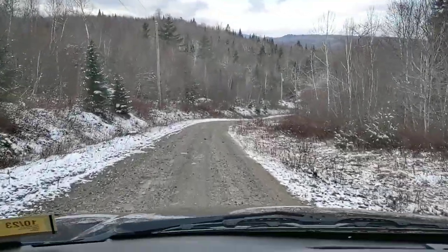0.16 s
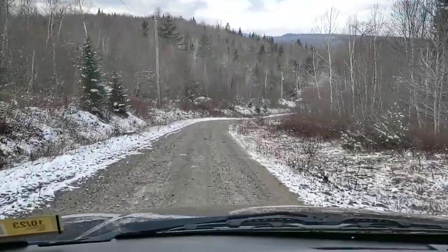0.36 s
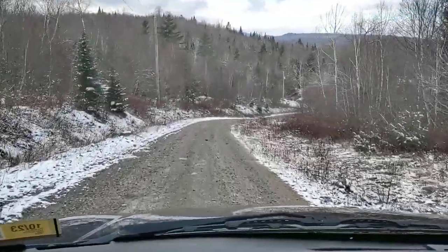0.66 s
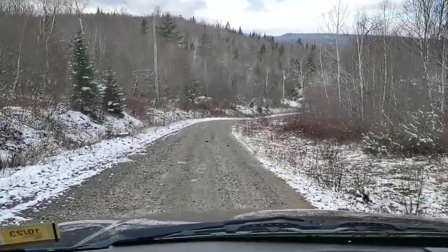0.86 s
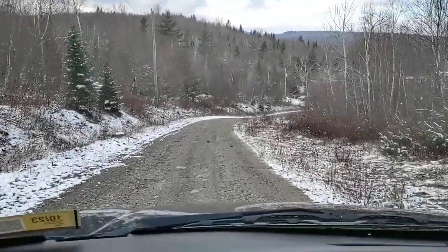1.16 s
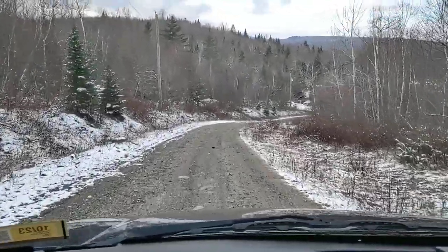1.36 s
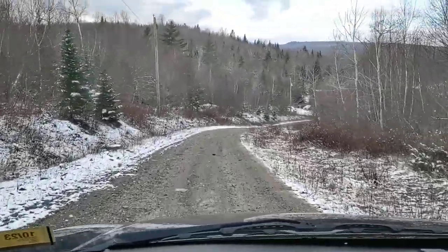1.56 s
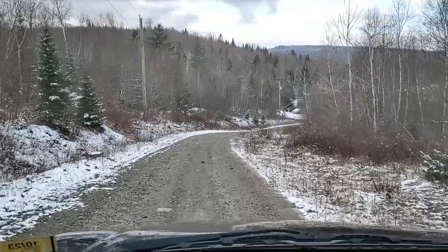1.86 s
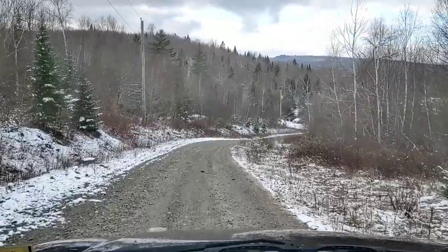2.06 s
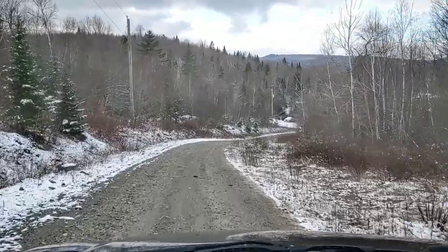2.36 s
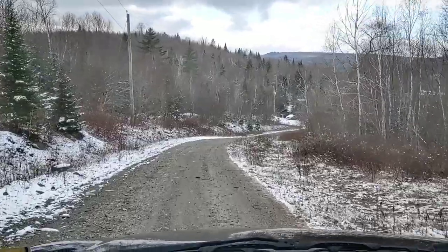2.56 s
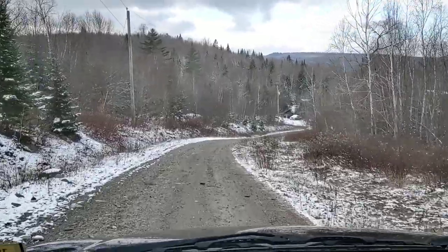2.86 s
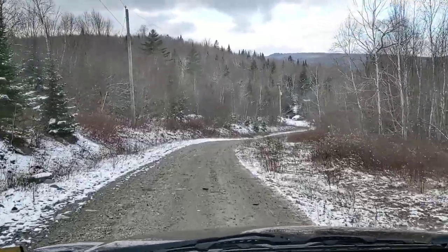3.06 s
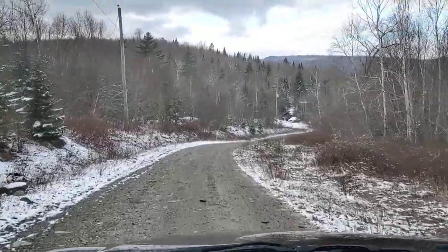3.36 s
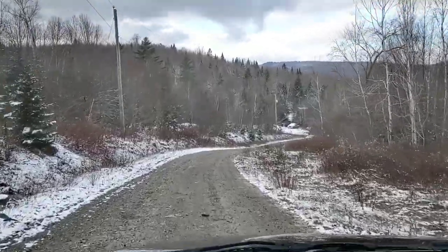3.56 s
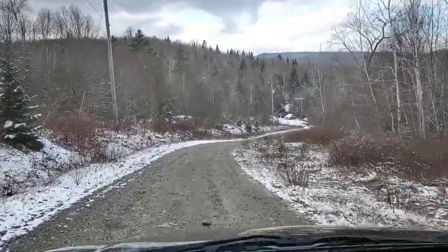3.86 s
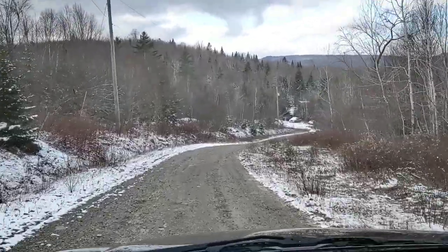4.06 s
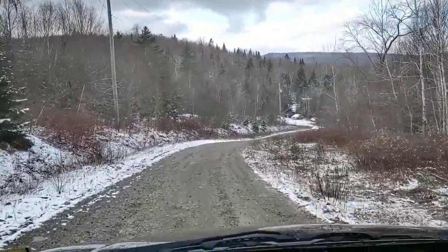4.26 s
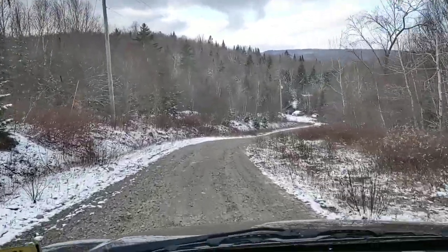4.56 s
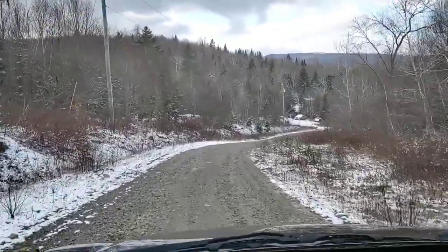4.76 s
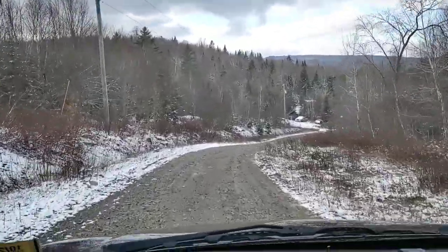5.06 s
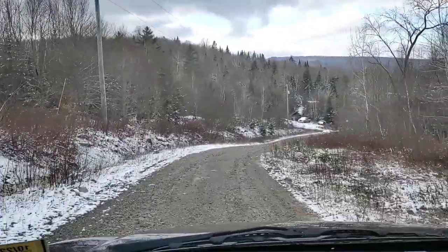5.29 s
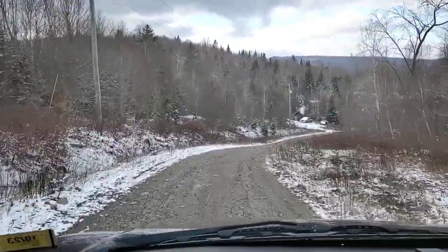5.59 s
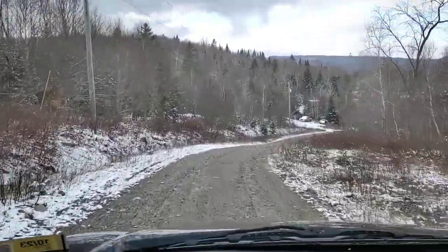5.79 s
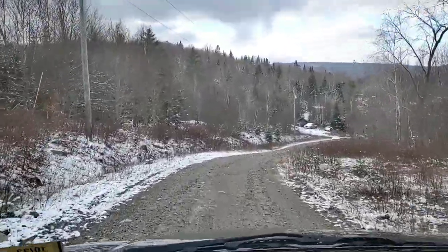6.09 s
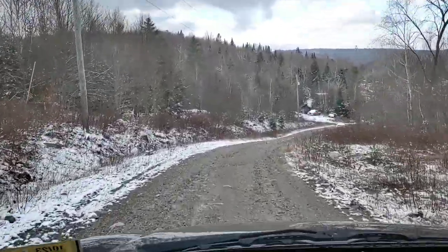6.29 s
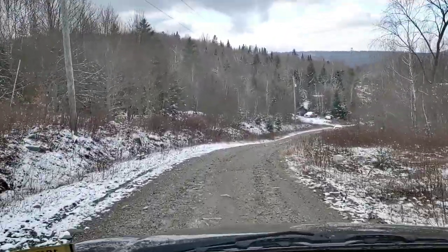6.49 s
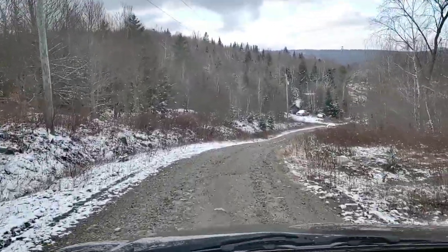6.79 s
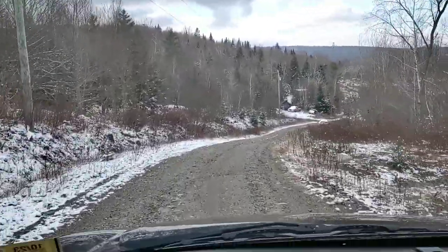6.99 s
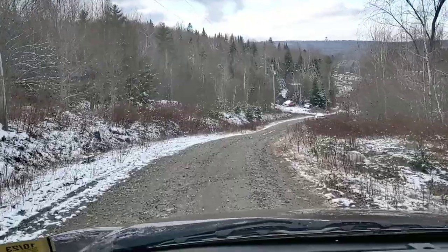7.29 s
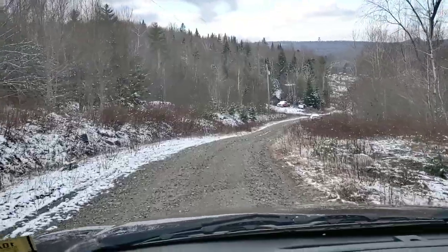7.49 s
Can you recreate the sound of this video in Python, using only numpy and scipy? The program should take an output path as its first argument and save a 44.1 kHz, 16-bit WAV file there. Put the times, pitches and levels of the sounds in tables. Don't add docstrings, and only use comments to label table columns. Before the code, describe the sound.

A quiet vehicle cabin on a rough dirt road, with a deep uneven rumble, muffled crackle, and scattered stones pinging against the wheel arches.

```python
import sys
import numpy as np
from scipy import signal
from scipy.fft import rfft, irfft, next_fast_len
from scipy.io import wavfile
from scipy.ndimage import uniform_filter1d, map_coordinates

SR = 44100
rng = np.random.default_rng(int(sys.argv[2]) if len(sys.argv) > 2 else 0)


def gain_from_decibels(decibels):
    exponent = np.asarray(decibels, float) / 20
    return 10 ** exponent


def to_wav(s):
    ch = np.atleast_2d(s).T
    pcm = np.round(np.clip(ch, -1, 1) * 32767)
    wavfile.write(sys.argv[1], SR, pcm.astype(np.int16))


N = 336924

# frequency_hz, density_db
HISS_SPECTRUM = [(1500, -10), (3000, -14), (6000, -4), (9000, -2), (12500, -20), (14000, -30)]
# frequency_hz, correlation
PORT_LIKENESS = [(60, 0.99), (130, 1), (270, 0.87), (580, 0.73), (1240, -0.044), (2650, -0.18),
                 (5650, 0.088), (12000, -0.024)]
# frequency_hz, left_minus_right_db
PORT_BALANCE = [(60, -1), (110, -1.5), (190, -2), (350, -2), (630, -0.5), (1140, 2.5), (2060, 2.5),
                (3710, 0), (6680, 0), (12000, -2)]
# frequency_hz, density_db
ENGINE_SPECTRUM = [(600, -30), (1150, 0), (1400, -10), (1750, -10), (2000, -4), (2400, -12), (7000, -30),
                   (13000, -45)]
# frequency_hz, t60_s
CABIN_DECAY = [(300, 0.1), (1500, 0.25), (5000, 0.099), (12000, 0.019)]

# start_s, peak_db, centre_hz
GRIT_CHIPS = [(0.9617, -67, 5110), (0.9996, -65, 5150), (1.4406, -73, 5190), (1.6043, -58, 5060),
              (2.1467, -53.5, 5400), (2.2034, -64, 5000), (2.5621, -65.5, 5030), (2.652, -62, 7400),
              (3.118, -61.5, 5080), (3.4017, -67, 5140), (3.5289, -80, 5110), (3.5698, -78, 5140),
              (3.738, -61.5, 5080), (3.8377, -60.5, 5110), (4.3046, -57.5, 5600), (5.5657, -70, 5560),
              (6.0422, -64.5, 5970), (6.106, -70, 5140), (6.369, -61.5, 5660), (6.6982, -75, 5130),
              (6.8567, -65, 5140), (6.8843, -61.5, 5840), (7.505, -70, 5100)]
# start_s, peak_db, centre_hz
STONE_BOUNCES = [(.353, -52.5, 1020), (.638, -81, 2700), (1.008, -55, 1200), (1.447, -49, 1150),
                 (1.870, -57, 1020), (1.966, -46.5, 1450), (2.214, -51, 1230), (2.529, -66, 2680),
                 (2.565, -61, 3000), (3.753, -56.5, 1980), (3.837, -54.5, 2840), (4.312, -51, 2220),
                 (4.306, -52, 2890), (4.953, -70, 3600), (5.597, -58, 1820), (6.517, -62.5, 2090),
                 (6.698, -70, 2300), (6.858, -62.5, 2100), (7.504, -51, 1260)]
# start_s, peak_db, ring_hz
TREAD_KNOCKS = [(0.354, -46, 423), (1.086, -40, 256), (1.095, -48, 177), (1.441, -42.5, 620),
                (1.599, -34, 197), (1.719, -36.5, 490), (1.871, -40, 318), (1.952, -39.5, 534),
                (2.149, -39, 700), (2.214, -41, 350), (2.444, -36.5, 507), (2.474, -37, 407),
                (2.484, -41.5, 704), (2.99, -51, 473), (3.207, -36, 272), (3.267, -41.5, 680),
                (3.527, -43, 500), (3.603, -45, 352), (3.706, -42, 297), (4.318, -47, 700),
                (5.851, -45.5, 735), (6.045, -62, 307), (6.158, -48, 340), (6.211, -44.5, 270),
                (6.363, -68, 353), (6.446, -41, 410), (6.604, -42.5, 290), (6.914, -45, 340),
                (7.07, -49, 318), (7.285, -45.5, 487)]
# start_s, peak_db, ring_hz, left_minus_right_db
CLEAR_PINGS = [(.633, -64, 2650, 2), (.933, -56, 900, 0), (1.083, -62, 2550, 0), (1.199, -53.5, 1360, -2),
               (1.446, -60, 4760, 0), (1.596, -58, 5100, 2), (1.602, -44, 720, 9), (1.606, -46, 2930, 6),
               (1.607, -52, 4630, 0), (1.654, -44, 1480, 5), (1.659, -56, 2930, 2), (1.829, -62, 2920, 5),
               (1.870, -45, 793, 0), (2.149, -46, 3880, -2), (2.205, -51, 4920, 4), (2.216, -48, 1970, 0),
               (2.248, -55, 3000, 4), (2.444, -59, 3840, 0), (2.473, -37, 590, -2), (2.481, -47, 680, 0),
               (2.489, -41, 650, 5), (2.731, -56, 900, 2), (3.200, -47, 804, 0), (3.265, -57, 2700, 5),
               (3.271, -44, 700, -3), (3.391, -61, 2600, 0), (3.526, -60, 3850, 0), (3.652, -54, 2960, 0),
               (3.705, -61, 2900, 0), (3.754, -64, 4200, 0), (3.790, -44, 764, 3), (3.974, -61, 790, -7),
               (4.306, -48, 2860, 0), (4.307, -33.5, 734, 0), (4.308, -42.5, 2170, -6),
               (4.498, -55, 815, 0), (5.266, -63, 2720, -1), (5.372, -58, 770, 0), (5.763, -63, 2960, 0),
               (5.860, -61, 3000, 0), (6.044, -54, 2900, 0), (6.045, -61, 4600, 2), (6.110, -57, 2500, 0),
               (6.160, -57, 796, -2), (6.504, -66, 2710, 3), (6.638, -64, 2610, 0), (6.915, -50, 815, 0),
               (6.934, -63, 2880, 0), (7.097, -62, 2580, 0), (7.360, -61, 2520, 0)]
# start_s, peak_db, ring_hz, edge_db, left_minus_right_db
STEEL_HITS = [(.3521, -53, 1400, -7, -3), (1.6005, -42.5, 1850, -20, 2), (2.0423, -65, 1990, -21, 23),
              (2.1474, -36, 2180, -6, 0.5), (2.2044, -44.5, 2640, -4, 10), (2.2478, -49.5, 2040, -22, 10),
              (3.1388, -48.5, 1390, -25, 6), (3.1717, -48, 1660, -18, 3), (3.1991, -48.5, 2140, -24, 6),
              (3.2345, -51, 1930, -19, 8), (3.2849, -47.5, 1440, -19, 7), (3.7883, -47, 2080, -10, 0),
              (3.8377, -48, 1940, -26, 4), (4.3066, -46, 2300, -11, 3), (5.3113, -53, 1900, -6, 2),
              (6.8838, -54, 1520, -4, 3), (7.0723, -53, 1620, -11, 1), (7.1621, -51, 1460, -10, 3)]
# start_s, peak_db, ring_hz, edge_db, left_minus_right_db
LINER_HITS = [(0.9973, -44.5, 1300, -9, -1), (1.155, -48, 1390, -28, 4), (1.4398, -41, 1420, -8.5, 2),
              (1.5028, -45.5, 1410, -10, 0), (1.6063, -49, 2720, 5.5, 0), (1.6533, -39.5, 1480, -20, 7),
              (1.952, -36, 1450, -41, 1), (2.4457, -37, 1530, -12, 3), (2.99, -47, 1520, -13, -5.5),
              (3.118, -49, 2220, -28, 5), (3.5275, -37.5, 1500, -10, 2), (3.571, -41, 2680, -5.5, 7.5),
              (3.6516, -62, 2480, -25, -2), (3.7365, -43.5, 1430, -16, 6), (5.8572, -45.5, 1640, -9, 0),
              (6.0412, -49, 1470, -9, 5), (6.1095, -43.5, 1390, -9, 2), (6.789, -51, 1530, -10, -3),
              (7.1184, -50.5, 1510, -20, -2), (7.5046, -53, 2000, -1, 6)]
# start_s, peak_db, ring_hz
PEBBLE_HITS = [(0.743, -51, 1740), (0.9343, -48.5, 1430), (0.9613, -50.5, 2020), (1.1197, -50.5, 1950),
               (1.197, -53, 1840), (1.7485, -51, 1510), (2.5112, -57, 1500), (2.731, -62, 1510),
               (3.3206, -55, 1610), (3.3325, -63, 1420), (3.626, -51.5, 1490), (3.898, -52, 1470),
               (3.973, -75, 1500), (4.248, -63, 1490), (4.498, -57, 1460), (4.7371, -71, 1660),
               (4.8983, -57, 1400), (5.2614, -55, 1520), (5.377, -67, 1560), (5.584, -50.5, 1410),
               (5.8911, -47, 1440), (6.516, -63, 1500), (6.641, -56, 1560), (6.8458, -66, 1750),
               (6.856, -48.5, 1350), (7.0369, -52, 1480), (7.205, -50.5, 1890), (7.2932, -51.5, 1500)]
# centre_hz, width_hz, level_db
PANEL_MODES = [(533, 130, -5), (735, 150, 25), (900, 35, -7)]

# start_s, peak_db, swing_hz
BODY_THUMPS = [(0.056, -48, 81.7), (0.165, -44, 51.1), (0.33, -42.5, 49), (0.43, -44.5, 60),
               (0.602, -40.5, 72.7), (0.911, -39.5, 53), (0.986, -39, 69), (1.079, -41, 56.5),
               (1.593, -30, 48.8), (1.659, -33, 51.1), (1.841, -34, 65), (2.041, -41, 80),
               (2.14, -45.5, 88), (2.339, -37.5, 43.1), (2.563, -42, 87.5), (2.735, -40.5, 58.3),
               (2.899, -41, 63.4), (3.123, -44, 43.1), (3.374, -35.5, 63.6), (3.572, -47, 53.8),
               (3.774, -40, 46), (3.911, -38, 46), (4.018, -39, 51.5), (4.286, -39, 48.4),
               (4.359, -43, 42.7), (4.578, -47, 51), (4.816, -44, 67.3), (4.927, -42, 51.1),
               (5.01, -41.5, 55), (5.249, -34.5, 51.5), (5.395, -38, 56.5), (5.578, -34.5, 71),
               (5.759, -34.5, 64.6), (5.852, -33, 59.6), (5.95, -42, 59.2), (6.194, -42, 53.3),
               (6.298, -47, 94.2), (6.419, -41, 52.7), (6.639, -33, 56.8), (6.905, -42, 45.8),
               (6.968, -36, 67.3), (7.061, -43, 54.7), (7.302, -35, 46), (7.449, -38, 54.3)]
# start_s, peak_db, ring_hz
TYRE_PUNCHES = [(0.235, -51, 172), (0.625, -66, 121), (0.753, -45, 140), (0.93, -45, 121),
                (0.998, -45, 262), (1.084, -35.5, 184), (1.109, -37, 180), (1.149, -41, 148),
                (1.717, -42.5, 142), (2.056, -42, 121), (2.421, -37.5, 162), (2.933, -46, 122),
                (3.127, -47, 184), (3.169, -45, 164), (3.198, -42, 172), (3.229, -45, 121),
                (3.257, -44, 140), (3.299, -41, 121), (3.705, -40, 127), (3.784, -47, 159),
                (3.856, -48, 121), (4.241, -53, 120), (5.45, -47, 121), (6.438, -38.5, 141),
                (6.6, -37, 141), (6.645, -36.5, 136), (7.35, -50, 121), (7.498, -43, 258)]

# time_s, roughness_db (as drone level), loose_gravel_db
ROAD_SURFACE = [(0.0, -63, 0), (0.42, -62.5, 3), (0.89, -57.5, -1), (1.08, -53, -0.5), (1.36, -57.5, 1),
                (1.78, -51.5, 2), (2.38, -56.5, 1.5), (2.53, -55.5, 3), (2.83, -55.5, 1.5),
                (3.76, -53.5, 0.5), (3.96, -55.5, 1.5), (4.04, -53.5, 0.5), (4.87, -61.5, -1.5),
                (5.3, -55, 0), (5.47, -55, 0.5), (6.89, -54, 0), (7.11, -56.5, 2), (7.64, -53.5, -0.5)]
# centre_s, change_db
SURFACE_SPOTS = [(.8, -5.5), (1.38, -3.5), (1.81, -3), (2.68, -5.5), (2.83, -1.5), (3.003, -5), (3.45, -2),
                 (3.66, -4), (4.19, -6.5), (4.89, 2.5), (5.17, -3), (5.93, 0.5), (6.52, 0), (7.19, -2),
                 (7.63, -5)]
# centre_s, body_swell_db, tyre_wall_swell_db
ROAD_JOLTS = [(.1, 4, 2), (.35, 3, 2.5), (.64, -0.5, 4), (.96, -7, 1), (1.09, 1, -4.5), (1.62, 0.5, 0),
              (1.87, -7, -4), (2.15, 1, -1), (2.4, 2.5, 1), (2.77, 3, -2.5), (2.94, 1, -1), (3.21, -1.5, 6),
              (3.49, -1, -4), (3.8, 2, 2), (4.36, 5, -1.5), (4.83, -4.5, 0), (5.27, 0, -0.5), (5.45, 3, 2),
              (5.7, 1, 0), (5.88, -2.5, 1.5), (6.23, 4, 1.8), (6.66, 0, 0.5), (6.85, -3.5, -0.5),
              (6.93, 5, -0.5), (7.1, 4.5, 0.5), (7.34, -2, 2.5), (7.5, 1.5, -3.5)]
# centre_s, crunch_db
GRAVEL_HEAPS = [(.64, 2), (.87, -3), (2.65, 6.5), (3.22, 4), (3.87, 4), (4.12, 0.5), (5.66, -1.5),
                (5.78, 3), (6.22, 5), (6.58, -1.5), (6.7, 4), (7.26, -6)]
# frequency_hz, density_db
BOOM_SPECTRUM = [(11, -48), (22, -18), (36, -5.5), (54, -3.5), (125, -17.5), (160, -45), (280, -120)]
# frequency_hz, density_db
THRUM_SPECTRUM = [(59, -28.5), (100, 0.5), (171, -0.5), (210, -13), (260, -8), (340, -22.5), (570, -120)]
# frequency_hz, density_db
DRONE_SPECTRUM = [(140, -34), (230, -5), (312, -1), (393, -5.5), (442, -4.5), (569, -3.5), (718, -4.5),
                  (829, -6.5), (1020, -18.5), (1300, -19), (1690, -27), (2860, -120)]
# frequency_hz, density_db
CRUNCH_SPECTRUM = [(560, -19), (950, 1), (1240, 1), (1430, -6.5), (2430, -7.5), (3210, -14), (4490, -18.5),
                   (6270, -24.5), (7210, -25), (8120, -31), (12500, -34.5), (16200, -51), (22000, -120)]


def unit(x):
    return x / np.sqrt(np.mean(x ** 2) + 1e-20)


def peaked(x, db):
    return gain_from_decibels(db) * x / np.abs(x).max(1, keepdims=True)


def along(points, hz):
    f, value = np.transpose(points)
    return np.interp(np.log(hz + 1), np.log(f + 1), value)


def filtered(x, response):
    m = next_fast_len(x.shape[-1] + 1024)
    return irfft(rfft(x, m) * response(np.fft.rfftfreq(m, 1 / SR)), m)[..., :x.shape[-1]]


def modes(table):
    def response(f):
        total = 0
        for k, (centre, width, db) in enumerate(table):
            resonance = 1j * f * width / (centre * centre - f * f + 1j * f * width)
            total = total + (-1) ** k * gain_from_decibels(db) * resonance
        return total
    return response


def between(low_hz, high_hz):
    return lambda f: (1j * f / (low_hz + 1j * f)) ** 2 / (1 + 1j * f / high_hz) ** 4


def blow(rise, t60):
    t = np.arange(4096) / SR
    burst = (1 - np.exp(-(t / rise) ** 2)) * gain_from_decibels(-60 * t / t60) * rng.standard_normal((2, len(t)))
    z = rfft(burst)
    return irfft(z / np.sqrt(np.abs(z) + 1e-9), len(t))


def struck(burst, resonances, low_hz, high_hz):
    return filtered(filtered(burst, modes(resonances)), between(low_hz, high_hz))


def swing(hz, rise, t60, phase):
    t = np.arange(int(t60 * SR)) / SR
    x = (1 - np.exp(-(t / rise) ** 2)) * gain_from_decibels(-60 * t / t60) * np.sin(2 * np.pi * hz * t + phase)
    return x / np.abs(x).max()


def place(out, start_s, hit):
    out[..., round(start_s * SR):][..., :hit.shape[-1]] += hit


def wobble(rate):
    knots = rng.standard_normal(int(N * rate / SR) + 4)
    return map_coordinates(knots, [np.arange(N) * rate / SR])


def ports(pair, colour):
    def share(hz):
        turn = np.arccos(np.clip(along(PORT_LIKENESS, hz), -1, 1)) / 2
        return colour(hz) * [np.cos(turn), np.sin(turn)]

    mid, side = filtered(pair, share)
    halves = np.array([[.5], [-.5]])
    return filtered(np.array([mid + side, mid - side]), lambda hz: gain_from_decibels(along(PORT_BALANCE, hz) * halves))


def rush(spectrum, shaking, patchy_db):
    z = signal.stft(shaking * rng.standard_normal((2, N)), nperseg=512)[2]
    patches = uniform_filter1d(rng.standard_normal(z.shape[1:]), size=16, axis=0)
    patches = uniform_filter1d(patches, size=3, axis=1)
    pair = signal.istft(z * gain_from_decibels(patchy_db * unit(patches)), nperseg=512)[1][:, :N]
    return unit(ports(pair, lambda hz: gain_from_decibels(along(spectrum, hz))))


def engine_whirr():
    return gain_from_decibels(-77) * rush(ENGINE_SPECTRUM, 1, patchy_db=.4)


def cabin(x):
    hz, t, z = signal.stft(rng.standard_normal((2, SR // 4)), SR, nperseg=256)
    decay = gain_from_decibels(-60 * t / along(CABIN_DECAY, hz)[:, None])
    tail = signal.istft(z * decay, SR, nperseg=256)[1]
    delayed = np.pad(x, ((0, 0), (130, 0)))
    return signal.fftconvolve(delayed, tail / np.linalg.norm(tail[0]), axes=1)[:, :N]


def grit():
    out = np.zeros((2, N + SR))
    for s, db, hz in GRIT_CHIPS:
        snap = struck(blow(rise=0.0021, t60=0.038), [(hz, 0.63 * hz, 0)], 3400, 11600)
        place(out, s - .001, peaked(snap, db + 7.5))
    return out[:, :N]


def bounces():
    out = np.zeros((2, N + SR))
    for s, db, hz in STONE_BOUNCES:
        spot = [(hz, 0.11 * hz, 0), (1.3 * hz, 0.9 * hz, -12)]
        scrape = struck(blow(rise=0.00059, t60=0.05), spot, 500, 4900)
        place(out, s - .002, peaked(scrape, db + 7.5))
    return out[:, :N]


def knocks():
    out = np.zeros((2, N + SR))
    for s, db, hz in TREAD_KNOCKS:
        floor = [(hz, 0.29 * hz, 0), (1.924 * hz, 0.6 * hz, -7)]
        a, b = struck(blow(rise=0.0012, t60=0.13), floor, 86, 1450)
        thud = np.array([a + 0.29 * b, a - 0.24 * b])
        place(out, s - .002, peaked(thud, db - 0.5))
    return out[:, :N]


def pings():
    out = np.zeros((2, N + SR))
    for s, db, hz, pan_db in CLEAR_PINGS:
        turn, lead = rng.random(2)
        apart = (lead - .5) * min(hz / 500, np.pi)
        for channel, side in zip(out, (.5, -.5)):
            ring = swing(hz, .0004 + 1 / hz, .003 + 24 / hz, 2 * np.pi * turn + side * apart)
            place(channel, s - .001, gain_from_decibels(db + side * pan_db) * ring)
    return out[:, :N]


def stones():
    thrown = [(*row, 13.5) for row in STEEL_HITS]
    thrown += [(*row, 1) for row in LINER_HITS]
    thrown += [(*row, -13, 0, -10) for row in PEBBLE_HITS]
    out = np.zeros((2, N + SR))
    for s, db, hz, bright_db, pan_db, panel_db in thrown:
        spot = [(hz, .13 * hz, 0), (1.5 * hz, .5 * hz, -11), (.88 * hz, .13 * hz, -1), (.68 * hz, .2 * hz, -9)]
        tick = peaked(struck(blow(rise=.002, t60=.045), spot, 460, 7800), db - 0.5)
        shake = blow(rise=0.00075, t60=0.07)[[0, 0]]
        panel = peaked(struck(shake, PANEL_MODES, 170, 1800), db + panel_db - 11.5)
        edge = struck(blow(rise=0.0023, t60=0.019), [(4340, 4700, 0)], 2100, 3200)
        edge = peaked(edge, db + bright_db + 0.5)
        pan = gain_from_decibels(np.array([[pan_db / 2], [-pan_db / 2]]))
        place(out, s - .0018, (tick + edge) * pan + panel)
    return out[:, :N]


def damped_swings(table, add_db, rise, t60):
    out = np.zeros(N + SR)
    for s, db, hz in table:
        x = swing(hz, rise, t60, 2 * np.pi * rng.random())
        place(out, s, gain_from_decibels(db + add_db) * x)
    return out[:N]


def thumps():
    body = damped_swings(BODY_THUMPS, add_db=-3, rise=0.016, t60=.2)
    tyre = damped_swings(TYRE_PUNCHES, add_db=-4, rise=.004, t60=.07)
    return body + tyre


def spots(times, sizes_db, half_s):
    t = np.arange(0, N + 64, 64) / SR
    bells = np.exp(-((t[:, None] - times) / half_s) ** 2) @ sizes_db
    return np.interp(np.arange(N) / SR, t, bells)


def surface():
    average_db, jolt_s = -56, 0.096
    s, rough_db, loose_db = np.transpose(ROAD_SURFACE)
    t = np.arange(N) / SR
    rough = np.interp(t, s, rough_db) + spots(*np.transpose(SURFACE_SPOTS), 0.062) - average_db
    loose = np.interp(t, s, loose_db) + spots(*np.transpose(GRAVEL_HEAPS), 0.044)
    when, body_db, wall_db = np.transpose(ROAD_JOLTS)
    boom_db = -47 + rough + spots(when, body_db, jolt_s)
    thrum_db = -54.5 + 1.24 * rough + spots(when, wall_db, jolt_s)
    drone_db = average_db + rough
    crunch_db = -66.5 + 1.29 * rough + loose
    return boom_db, thrum_db, drone_db, crunch_db


def gravel(per_s, spread_db, t60):
    when, size = rng.random((2, int(np.ceil(per_s * N / SR))))
    size_db = np.minimum(-spread_db * np.log(size), 9)
    cracks = np.bincount((when * N).astype(int), gain_from_decibels(size_db), N)
    tail = gain_from_decibels(-120 * np.arange(SR // 8) / SR / t60)
    return np.abs(signal.fftconvolve(cracks, tail)[:N])


def road():
    boom_db, thrum_db, drone_db, crunch_db = surface()
    bumps = wobble(24)
    cracks = gravel(per_s=80, spread_db=4, t60=.05)
    boom = gain_from_decibels(boom_db) * rush(BOOM_SPECTRUM, gain_from_decibels(0.27 * bumps), patchy_db=-0.5)
    thrum = gain_from_decibels(thrum_db) * rush(THRUM_SPECTRUM, gain_from_decibels(0.22 * bumps), patchy_db=-0.1)
    judder = gain_from_decibels(.7 * bumps) * np.sqrt(1 + .4 * cracks)
    drone = gain_from_decibels(drone_db + 1.0) * rush(DRONE_SPECTRUM, judder, patchy_db=1.88)
    crackle = gain_from_decibels(.4 * bumps) * np.sqrt(1 + .7 * cracks)
    crunch = gain_from_decibels(crunch_db + 2.0) * rush(CRUNCH_SPECTRUM, crackle, patchy_db=2.5)
    return boom + thrum + drone + crunch


def scene():
    rolling = road() + engine_whirr() + thumps()
    hits = stones() + knocks() + grit() + bounces() + pings()
    return rolling + hits + gain_from_decibels(-16.0) * cabin(hits)


def roll_off(x):
    return signal.sosfilt(signal.butter(12, 12700, fs=SR, output="sos"), x)


def record(dry):
    hiss = unit(filtered(rng.standard_normal((2, N)), lambda hz: gain_from_decibels(along(HISS_SPECTRUM, hz))))
    low_cut_hz, top_hz = 26, 12700
    band = lambda hz: (1j * hz / (low_cut_hz + 1j * hz)) ** 2 * (hz < top_hz)
    mix = filtered(dry + gain_from_decibels(-89) * hiss, band)
    return roll_off(mix)


dry = scene()
out = record(dry)
to_wav(out)
```